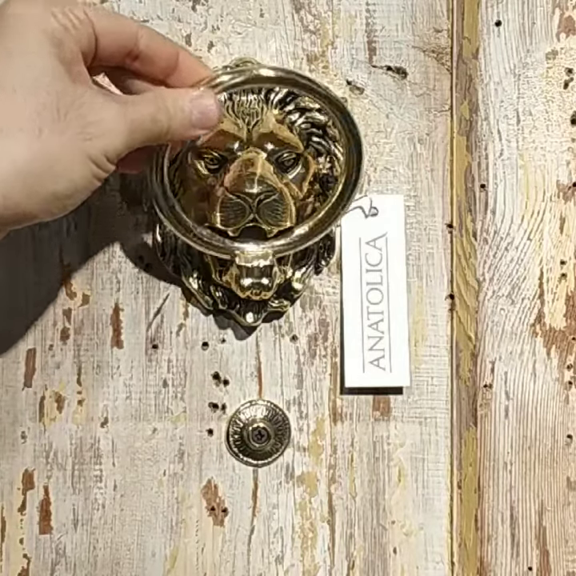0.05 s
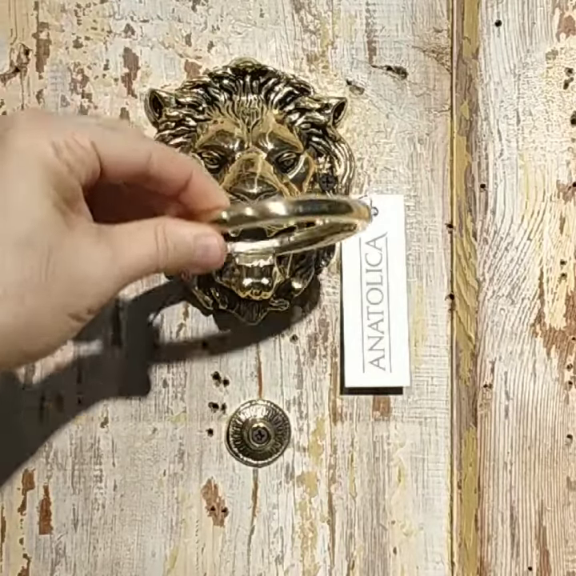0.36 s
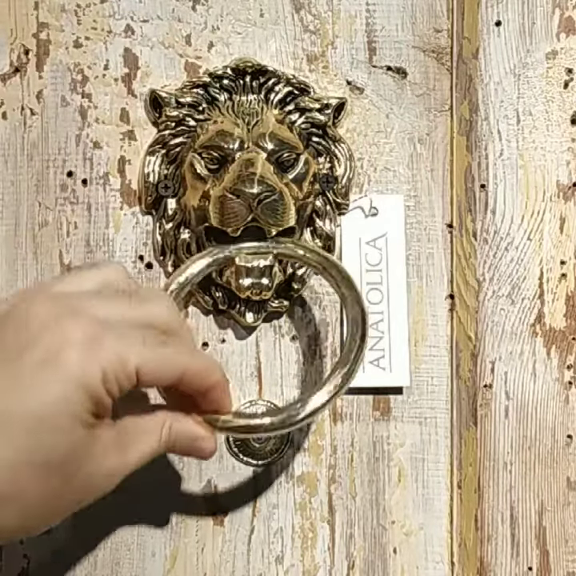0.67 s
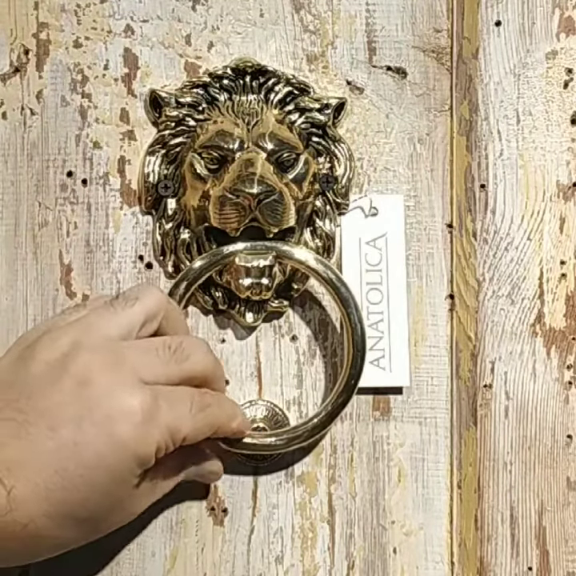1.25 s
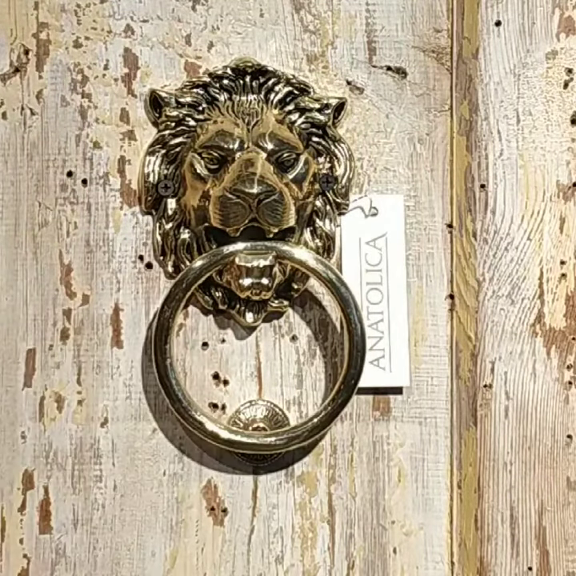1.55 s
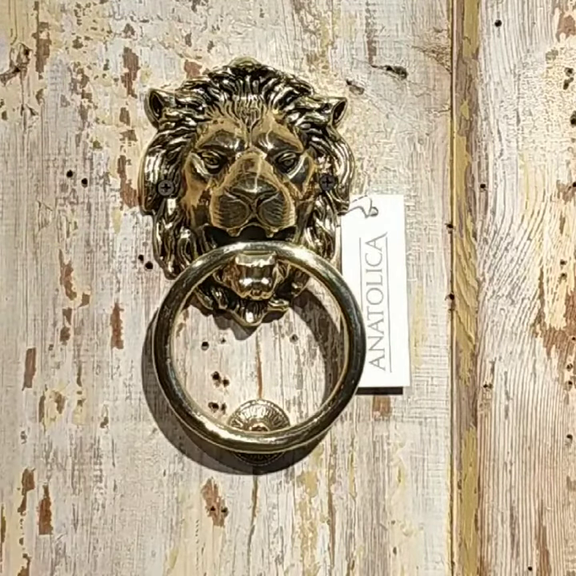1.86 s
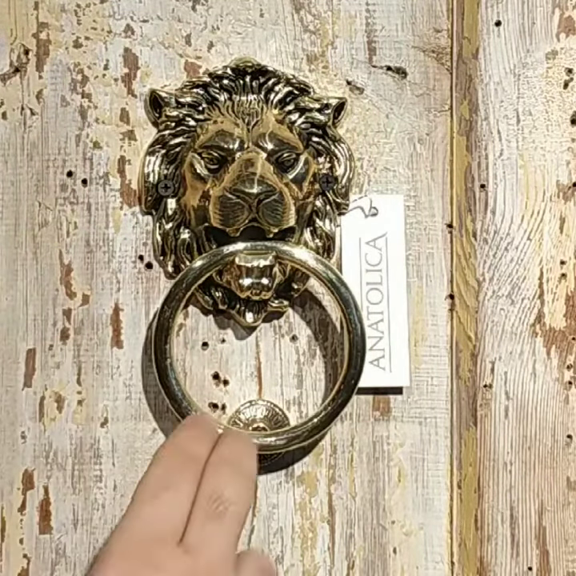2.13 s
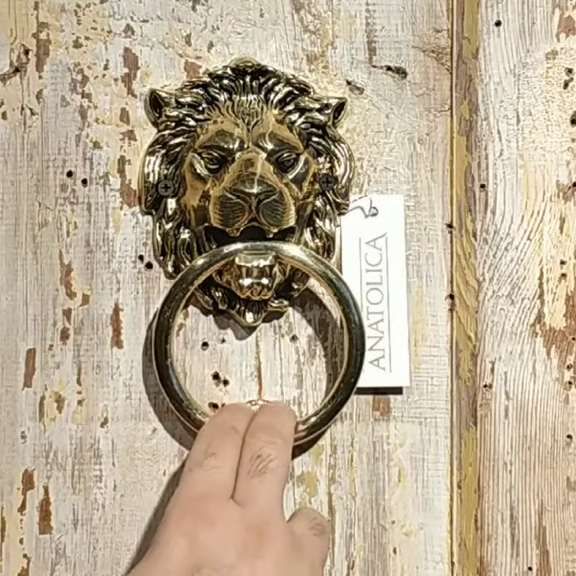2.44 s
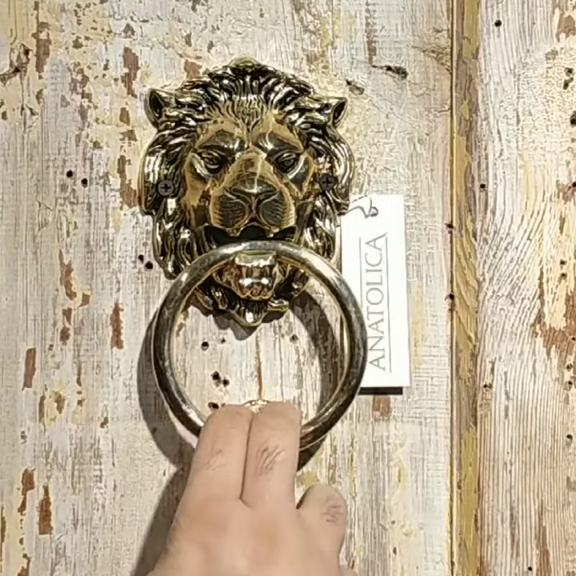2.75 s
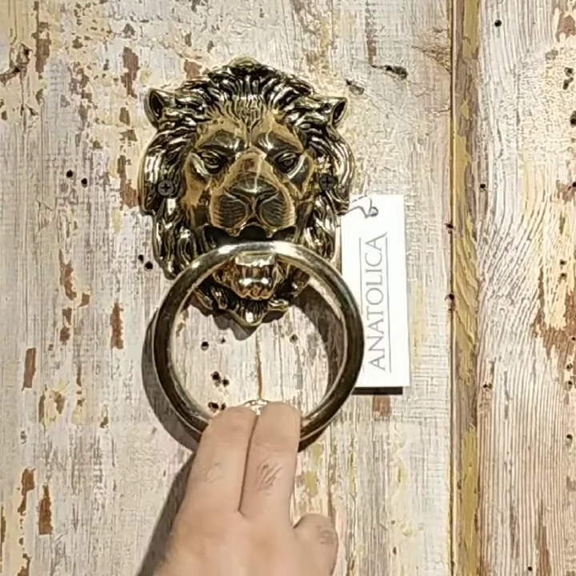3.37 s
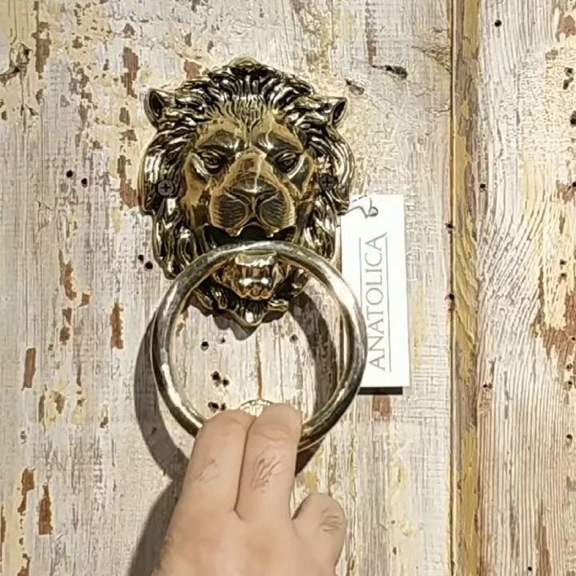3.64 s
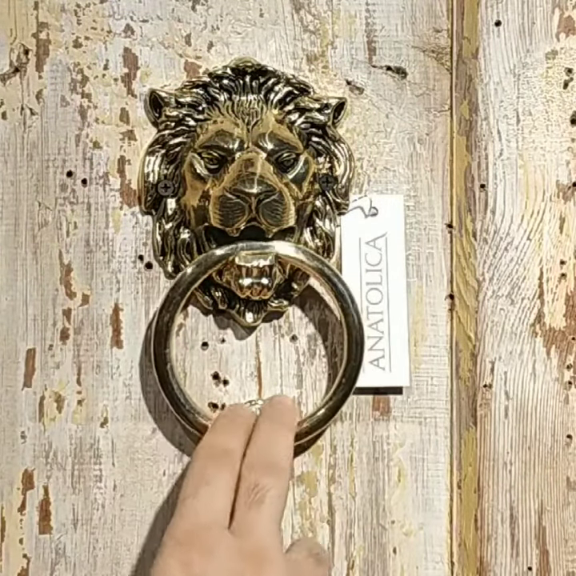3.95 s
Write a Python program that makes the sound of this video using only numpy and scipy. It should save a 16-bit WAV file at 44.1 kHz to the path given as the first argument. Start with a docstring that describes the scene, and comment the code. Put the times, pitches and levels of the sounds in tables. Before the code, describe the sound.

Three sharp knocks of a brass ring knocker on wood, after some light hinge clinks.

```python
"""A brass ring knocker on a wooden door in a large, live room. In the first second the ring is swung
down, clinking in its hinge, and let go. Dull thuds follow in the wood, and a sleeve rustles as the arm
leaves and comes back. From about 2.9 s the ring is rapped three times on its stud.
Clinks and raps ring both brass and door panel; the room carries each contact on over faint still air."""
import sys
import numpy as np
from scipy import signal
from scipy.fft import rfft, irfft
from scipy.io import wavfile
from scipy.ndimage import uniform_filter1d

SR = 44100
rng = np.random.default_rng(int(sys.argv[2]) if len(sys.argv) > 2 else 0)


def store_wav(level_fs):
    """Save 16-bit WAV to argv[1]."""
    pcm = np.round(np.clip(np.atleast_2d(level_fs), -1, 1) * 32767)
    wavfile.write(sys.argv[1], SR, pcm.T.astype(np.int16))


N = 176400

# Each row: frequency in Hz, relative dB when rapped, relative dB when clinking, loosely held t60 in s.
BRASS_MODES = [(1720, -16, -6, 0.18), (1848, -19, -29, 0.2), (2005, -16.5, -13, 0.097),
               (2146, -22, -6, 0.11), (2500, -35, -5.5, 0.024), (2687, -27, -11, 0.36),
               (3546, -12.5, -3.5, 0.16), (4177, -14, -11, 0.053), (4610, -9, -29, 0.054),
               (4680, -20, -31, 0.14), (5103, -9, -23, 0.051), (5245, -10.5, -14.5, 0.27),
               (5540, -10, -24.5, 0.12), (6160, -14.5, -17.5, 0.18), (6870, -14, -12, 0.15),
               (7530, -14.5, -14.5, 0.13), (7790, -4, -16, 0.12), (8190, -7.5, -21, 0.2),
               (8720, -7.5, -23, 0.045), (9360, -4, -15, 0.27), (9572, -0.5, -14, 0.14),
               (9950, -8.5, -21, 0.23)]
# Each row: frequency in Hz, relative level in dB, t60 in s.
PANEL_MODES = [(198.1, -13.5, 0.43), (266.2, -3.5, 0.18), (308.4, -3, 0.19), (361.8, -3, 0.22),
               (412.5, -8.5, 0.34), (502.3, -8.5, 0.05), (627, -16, 0.15), (724, -13.5, 0.13),
               (812.4, -6, 0.093), (893, -4, 0.061), (1140, -8, 0.06), (1202, -9, 0.045)]


def undb(db):
    return 10 ** (np.asarray(db) / 20)


def unit_energy(x):
    return x / np.sqrt(np.sum(x ** 2))


def highpass(x, hz, order):
    return signal.sosfilt(signal.butter(order, hz, "high", fs=SR, output="sos"), x)


def lookup(hz, table, column=1):
    """One table column, interpolated over log frequency."""
    table = np.array(table, float)
    return np.interp(np.log(hz + 1e-9), np.log(table[:, 0]), table[:, column])


def equalise(x, db_at):
    """Minimum-phase filter with a gain of db_at(hz)."""
    size = 2 * len(x)
    hz = np.arange(len(x) + 1) * SR / size
    cepstrum = irfft(np.log(undb(db_at(hz))))
    cepstrum[1:len(x)] *= 2
    cepstrum[len(x) + 1:] = 0
    return irfft(rfft(x, size) * np.exp(rfft(cepstrum)))[:len(x)]


def hiss(colour):
    """Steady coloured noise, rms 1."""
    noise = equalise(rng.standard_normal(N), lambda hz: lookup(hz, colour))
    return np.sqrt(N) * unit_energy(noise)


def decay(t60_s):
    """One second of exponential decay."""
    return np.exp(-np.log(1000) * np.arange(SR) / SR / t60_s)


def resonate(modes):
    """Decaying sines of alternating sign. Each row: frequency in Hz, level in dB, t60 in s."""
    t = np.arange(SR) / SR
    return sum((-1) ** k * undb(db) * unit_energy(np.sin(2 * np.pi * hz * t) * decay(t60_s))
               for k, (hz, db, t60_s) in enumerate(modes))


def gripped_brass(modes, detune=0.002):
    """The fingers shift each mode a little from one contact to the next."""
    shifts = 1 + detune * rng.standard_normal(len(modes))
    return resonate([(hz * shift, db, t60_s) for (hz, db, t60_s), shift in zip(modes, shifts)])


def clatter(colour, t60_s):
    """Resonances of casting and wood too dense to count: a coloured, decaying burst."""
    burst = rng.standard_normal(SR) * decay(t60_s)
    return unit_energy(equalise(burst, lambda hz: lookup(hz, colour)))


def strike(contacts, blow):
    """Each contact has its own loudness and brightness; columns after the tilt go to blow()."""
    out = np.zeros(N + 2 * SR)
    for start_s, db, tilt_db_per_oct, *settings in contacts:
        at = int(start_s * SR)
        gain_db = lambda hz: db + tilt_db_per_oct * np.log2(np.clip(hz, 250, 8000) / 1000)
        out[at:at + SR] += equalise(blow(*settings), gain_db)
    return out[:N]


def still_air():
    """Faint steady room tone."""
    # Each row: frequency in Hz, relative density in dB.
    colour = [(30, -40), (80, -25), (140, 0), (300, -1), (800, -9), (2000, -14), (5000, -21), (8000, -20),
              (10000, -24)]
    return undb(-66) * hiss(colour)


def hinge_clinks():
    """The loose ring turns, drops and rebounds; the contact point brings out modes near one pitch."""
    # Each row: start in s, gain in dB, tilt in dB/octave, brass gain in dB, panel gain in dB,
    # favoured pitch in Hz, clatter t60 in s.
    contacts = [(.004, -24.5, -2.5, -13.5, -6, 2070, 0.45), (.158, -20.5, -4.5, -5, -12, 2170, 0.26),
                (.234, -31, -1.5, -8.5, -20, 2520, 0.17), (.347, -18.5, -3.5, -14, -12, 4200, .1),
                (.358, -20.5, -2, -15, -31, 2150, 0.33), (.499, -22, -1.5, -7, -12, 2540, 0.68),
                (.703, -19.5, -3, -8, -10, 4060, 0.22), (.743, -11, -2, -4.5, -4, 2470, 0.18),
                (.763, -9.5, 1, -4.5, -13.5, 2080, 0.15), (.772, -8, -1.5, -10, -17, 2540, 0.13),
                (.848, -37, -2.5, -4, -14, 9410, .1), (.917, -20, -1, -1, -7, 3540, 0.044),
                (.924, -24, -3.5, -0.5, -25, 1714, 0.055), (.958, -21, 1, -10, -23, 2150, 0.063)]
    # Each row: frequency in Hz, relative clatter density in dB.
    colour = [(100, -13.5), (300, 11), (600, 6), (1200, 1.5), (2400, -4.5), (3200, -8), (6000, -16.5),
              (10000, -25.5)]
    favour_db, favour_width_oct = 7.5, 0.14

    def clink(brass_db, panel_db, favoured_hz, clatter_t60_s):
        boost_db = lambda hz: favour_db * np.exp(-(np.log2(hz / favoured_hz) / favour_width_oct) ** 2)
        brass = gripped_brass([(hz, db + boost_db(hz), t60_s) for hz, _, db, t60_s in BRASS_MODES])
        panel = resonate(PANEL_MODES)
        body = clatter(colour, clatter_t60_s)
        return undb(brass_db) * brass + undb(panel_db) * panel + undb(2.5) * body

    return undb(7.5) * strike(contacts, clink)


def room_echoes(x):
    """Diffuse echoes build up, then die away, soonest in the treble."""
    # Each row: frequency in Hz, echo level in dB, t60 in s.
    bands = [(154, 5, 0.94), (305, -0.5, 0.65), (460, 0, 0.77), (818, 3.5, 0.84), (1480, 2, 0.77),
             (3270, -3, 0.71), (6000, -8, 0.66), (10600, -8.5, 0.4)]
    delay_s, build_s = 0.0084, 0.039
    t = np.arange(2 * SR) / SR
    build = 1 - np.exp(-np.maximum(t - delay_s, 0) / build_s)
    spectrum = rfft(rng.standard_normal(len(t)))
    hz = np.arange(SR + 1) / 2
    centres_hz = np.geomspace(100, 12000, 15)
    response = 0
    for centre_hz, weights in zip(centres_hz, np.eye(len(centres_hz))):
        t60_s = lookup(centre_hz, bands, column=2)
        envelope = unit_energy(build * np.exp(-np.log(1000) * t / t60_s))
        band_noise = irfft(spectrum * np.interp(hz, centres_hz, weights))
        response += undb(lookup(centre_hz, bands)) * envelope * band_noise
    return signal.fftconvolve(x, response)[:N]


def door_thuds():
    """Dull low thuds in the wooden door, the strongest just after the first rap."""
    # Each row: start in s, gain in dB, tilt in dB/octave.
    thuds = [(.969, -21, -2.5), (1.31, -32.5, 0), (1.337, -23, 6), (1.82, -33, -5), (1.891, -51, -7),
             (1.986, -24.5, 4.5), (2.443, -31, 2), (2.527, -41.5, -4), (2.602, -23, -0.5), (2.715, -32, 3),
             (2.789, -17.5, 1), (2.829, -20, -1.5), (2.922, -8, -1.5), (3.212, -15.5, -1.5),
             (3.837, -20, -2)]
    # Each row: frequency in Hz, relative clatter density in dB.
    colour = [(100, -9.5), (320, 15), (600, 2), (1200, -9.5), (2400, -19), (5000, -26), (10000, -52)]
    attack_s = 0.0022
    attack = 1 - np.exp(-np.arange(SR) / SR / attack_s)

    def thud():
        return attack * (clatter(colour, t60_s=0.24) + undb(-16) * resonate(PANEL_MODES))

    return undb(11.5) * strike(thuds, thud)


def sleeve_rustle():
    """Cloth slides on cloth: two bands of grainy hiss swell and fade with the arm."""
    # Each row: time in s, relative middle level in dB, relative treble level in dB.
    levels = [(1.22, -112.5, -78), (1.282, -54, -52), (1.342, -47, -52.5), (1.372, -44.5, -50),
              (1.406, -47, -59), (1.518, -63.5, -69), (1.544, -57.5, -64), (1.582, -55.5, -64.5),
              (1.776, -61, -63), (1.79, -57.5, -49.5), (1.812, -52, -55.5), (1.932, -63, -66.5),
              (2.084, -61, -62), (2.394, -71.5, -70), (2.42, -78, -74), (2.56, -74.5, -83)]
    # Each row of both: frequency in Hz, relative density in dB.
    middle_colour = [(300, -22.5), (900, -1.5), (2000, 1), (4500, 2), (6500, -1.5), (8500, -8.5)]
    treble_colour = [(300, -59), (5000, -13.5), (7000, -10), (8800, 0), (10500, -9)]
    grain_rms_db, grain_s = 0.5, 0.006
    t = np.arange(N) / SR
    times_s, middle_db, treble_db = np.array(levels).T
    swell = lambda db: undb(np.interp(t, times_s, db, left=-120, right=-120))
    grain = np.sqrt(N) * unit_energy(uniform_filter1d(rng.standard_normal(N), int(grain_s * SR)))
    middle = swell(middle_db + 1) * hiss(middle_colour)
    treble = swell(treble_db + 5.5) * hiss(treble_colour)
    return undb(grain_rms_db * grain) * (middle + treble)


def sleeve_whistles(waver_hz=45):
    """Thin whistles in the rustle: brief glides, widened to narrow bands by phase noise."""
    # Each row: start in s, length in s, first pitch in Hz, last pitch in Hz, peak level in dB.
    glides = [(1.618, 0.059, 4750, 4970, -54), (1.684, 0.036, 8000, 8620, -50.5),
              (1.744, .04, 8800, 8200, -53), (1.774, .04, 8280, 8360, -53)]
    t = np.arange(N) / SR
    lowpass = signal.butter(2, waver_hz, fs=SR, output="sos")
    waver_rad = np.sqrt(N) * unit_energy(signal.sosfilt(lowpass, rng.standard_normal(N)))
    out = np.zeros(N)
    for start_s, length_s, from_hz, to_hz, db in glides:
        progress = np.clip((t - start_s) / length_s, 0, 1)
        phase_rad = 2 * np.pi * np.cumsum(from_hz + (to_hz - from_hz) * progress) / SR
        out += undb(db) * np.sin(np.pi * progress) * np.sin(phase_rad + waver_rad)
    return out


def stud_raps():
    """Ring on stud: a sharp crack, brass damped by the fingers and the boom of the panel."""
    # Each row: start in s, gain in dB, tilt in dB/octave.
    contacts = [(2.8585, -3.5, -1.5), (3.3953, -3, -1.5), (3.8748, -5, -1.46)]
    # Each row: frequency in Hz, relative clatter density in dB.
    colour = [(100, -21), (250, 7), (600, 3.5), (1000, 0.5), (1300, 2.5), (1600, -1.5), (2800, -1),
              (3800, -0.5), (4600, -1), (6000, -0.5), (7100, -1), (8200, 2.5), (10500, -14.5)]
    grip_t60_ratio, crack_decay_s, spread_s = 0.55, 0.00027, 0.00082
    t = np.arange(SR) / SR
    spread = 1 - np.exp(-t / spread_s)  # the blow spreads through casting and wood

    def rap():
        brass = gripped_brass([(hz, db, t60_s * grip_t60_ratio) for hz, db, _, t60_s in BRASS_MODES])
        panel = resonate(PANEL_MODES)
        burst = rng.standard_normal(SR) * np.exp(-t / crack_decay_s)
        crack = unit_energy(highpass(burst, hz=3800, order=2))
        body = spread * clatter(colour, t60_s=0.21)
        return undb(1) * brass + undb(-5) * panel + undb(0.5) * crack + undb(3) * body

    return undb(12.5) * strike(contacts, rap)


def scene():
    """The knocker is straight ahead; only the treble of the echoes spreads to the sides."""
    raps, clinks, thuds = stud_raps(), hinge_clinks(), door_thuds()
    send = raps + undb(-6.5) * clinks + undb(-13) * thuds
    side = undb(-29) * highpass(room_echoes(send), hz=5200, order=6)
    mid = raps + clinks + thuds + room_echoes(send) + sleeve_rustle() + sleeve_whistles() + still_air()
    return np.array([mid + side, mid - side])


def record(dry):
    """Thin the bass and cut the top steeply."""
    low_cut_hz, high_cut_hz = 153, 10100
    thinned = highpass(dry, low_cut_hz, order=4)
    return signal.sosfilt(signal.butter(20, high_cut_hz, fs=SR, output="sos"), thinned)


dry = scene()
out = record(dry)
store_wav(out)
```